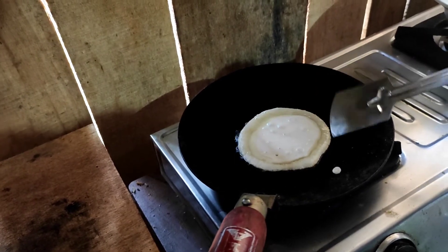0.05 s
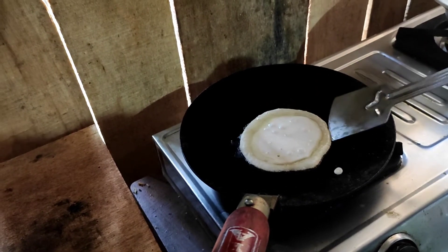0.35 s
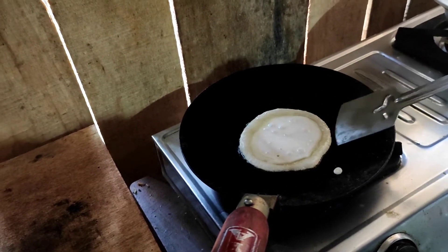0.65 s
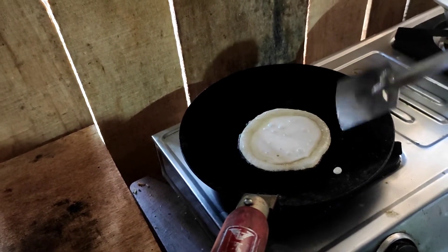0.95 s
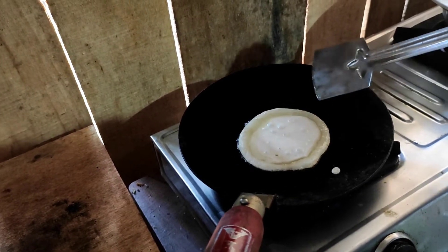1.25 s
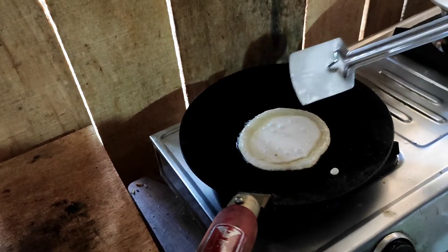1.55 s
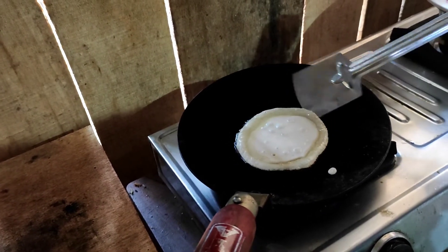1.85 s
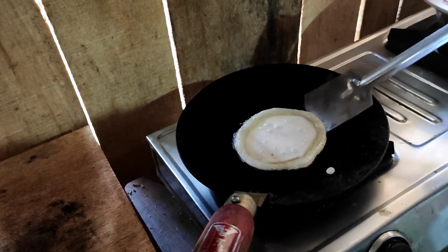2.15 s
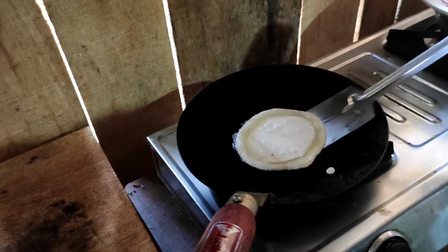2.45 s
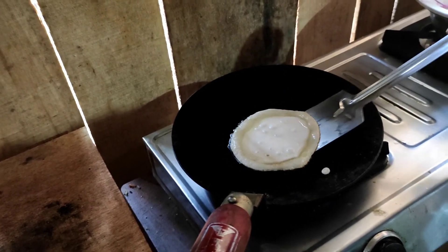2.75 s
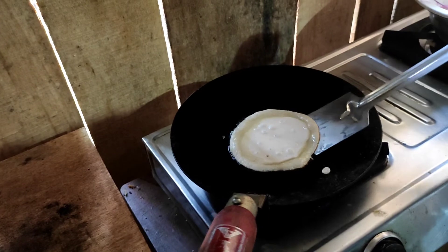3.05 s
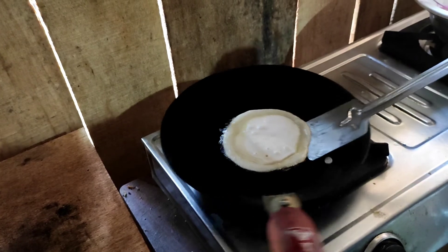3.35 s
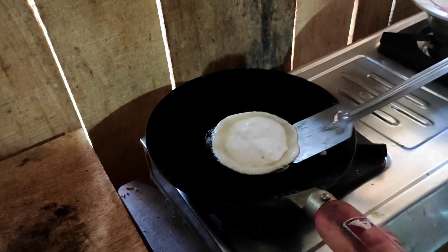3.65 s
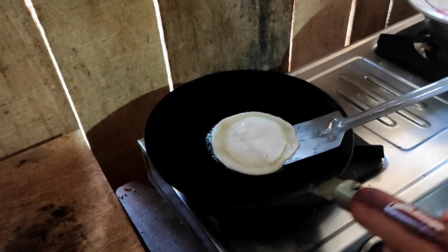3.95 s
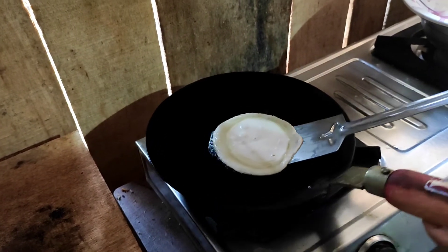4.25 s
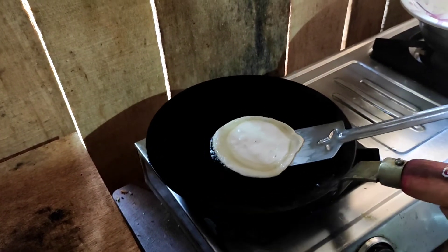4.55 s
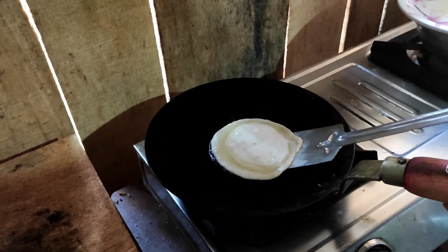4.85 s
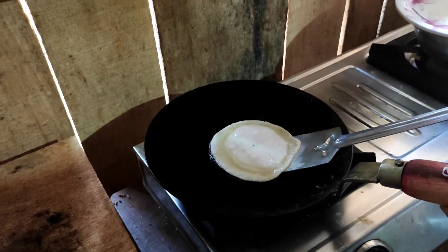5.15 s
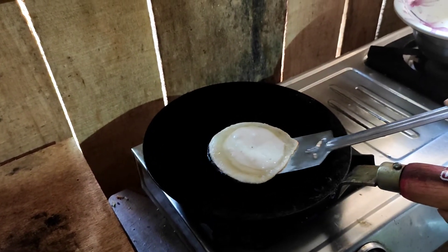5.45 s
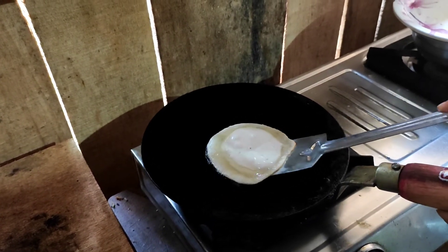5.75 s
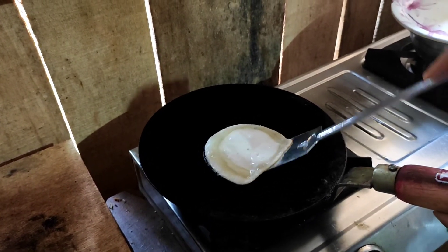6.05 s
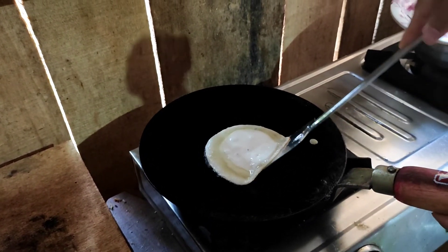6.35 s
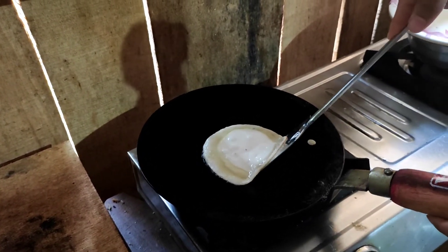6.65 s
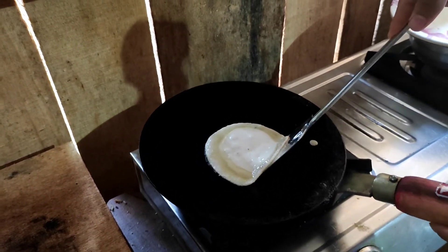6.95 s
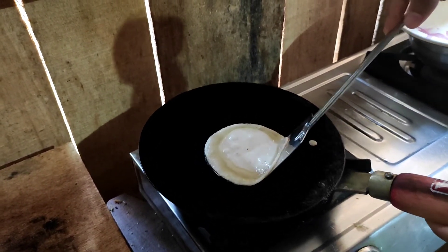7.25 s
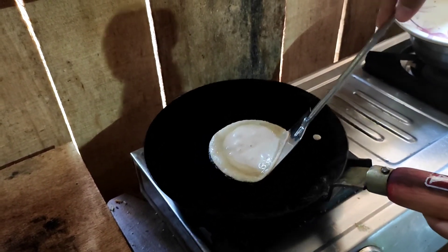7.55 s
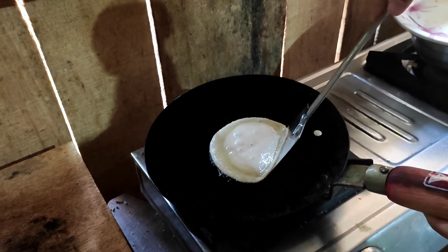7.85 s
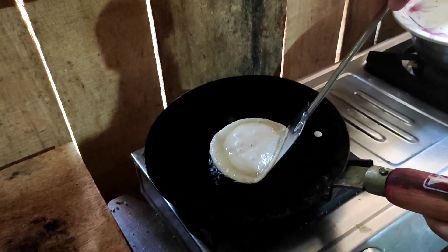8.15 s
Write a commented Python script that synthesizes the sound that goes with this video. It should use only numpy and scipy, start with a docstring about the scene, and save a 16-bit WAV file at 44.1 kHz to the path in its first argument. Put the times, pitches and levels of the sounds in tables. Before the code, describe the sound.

Heard up close in a small kitchen, oil sizzles softly over a low burner rush while a metal spatula rasps and ticks against an iron griddle. After a short lull, the scraping returns and the griddle shifts on the stove with a light grind and squeak. A busy run of bright clicks and scrapes follows as the pancake's crust crackles, with occasional dull bumps on the microphone, easing near the end.

```python
"""In a small kitchen, a steel spatula works under a pancake on a hot iron griddle, heard from close by.
Stick-slip friction makes the blade scrape, snag and click. The crust crackles, the griddle grinds on its
stand and shakes the stove, and oil sizzles over the burner's rush. Each contact briefly excites the modes
of blade and griddle; the room reflects the sound, and two microphone ports add their own resonances.
Dull thumps at the microphone, mostly on the left, coincide with some loud clicks."""
import sys
import numpy as np
from scipy import signal
from scipy.fft import rfft, irfft
from scipy.io import wavfile
from scipy.ndimage import uniform_filter1d

SR = 44100
rng = np.random.default_rng(int(sys.argv[2]) if len(sys.argv) > 2 else 0)


def master_out(mix):
    """Clip the mix to full scale and print it as 16-bit PCM to the path in sys.argv[1]."""
    frames = np.transpose(np.atleast_2d(mix))
    ceiling = np.clip(frames, -1, 1)
    pcm = np.round(ceiling * 32767).astype(np.int16)
    wavfile.write(sys.argv[1], SR, pcm)


N = 361179
TIME = np.arange(N) / SR

# snags of the blade on griddle and crust, levels relative: start_s, level_db, body_db, skid_db
SNAGS = [(.0968, -31, -6, -8), (.169, -25.5, -7, 0), (.362, -27, -3.5, -15), (0.779, -16, -5.5, 2),
         (0.798, -18, -11, -10), (.9213, -20, -6, -2), (0.9543, -16, -2, -21), (1.059, -23, -5, -2),
         (1.128, -19.5, -2, -2.5), (1.1377, -29.5, 5, 7), (1.187, -26, -0.5, 4.5), (1.3589, -20.5, -5, -14),
         (1.6133, -32.5, -4, -8), (1.718, -37, 14, -3), (2.595, -21, -0.5, 12), (2.8846, -18, 1, 3),
         (2.9371, -19.5, 3, 6.5), (3.1701, -23, -3.5, 4), (3.5489, -14.5, -2.5, -17.5),
         (3.7183, -16.5, -3, -3.5), (4.078, -25, -15, -10), (4.1834, -23.5, -0.5, 3), (4.2523, -26, -10, 0),
         (4.459, -36, 16, -1), (4.6452, -26.5, 2, -12), (4.6978, -18, -4.5, -22), (4.736, -17, 3.5, -12),
         (4.8791, -16.5, 2.5, 6), (4.9052, -19, -4, 1), (5.0995, -25, 1, -9), (5.135, -26.5, -21, -17),
         (5.172, -33, -2, -18), (5.2816, -18.5, 1.5, 3), (5.326, -22.5, -2, -20), (5.35, -17.5, -5.5, -19),
         (5.3693, -21, 0, -5), (5.3938, -21.5, -2, 3), (5.4074, -17, 3, -5), (5.4928, -17.5, -3, -20),
         (5.5658, -18.5, 1, 4.5), (5.6315, -22.5, -22, -1), (5.6575, -20.5, -12, -14),
         (5.6827, -14.5, 4, -9), (5.8062, -23.5, 4.5, -3), (5.8532, -21, -8, 4), (5.875, -19.5, 0, 0.5),
         (5.955, -23.5, -9, -6), (5.9934, -21.5, 5, -1), (6.031, -14, 0.5, 5.5), (6.0721, -19.5, 3, 2),
         (6.1225, -22, 2, -11), (6.1393, -12.5, 5, -11), (6.2402, -13.5, 2, -18), (6.286, -26, -6, -8),
         (6.301, -21.5, -8, -6), (6.3281, -16.5, -4, -14), (6.353, -15, -4, -19), (6.3881, -17.5, 1, 1),
         (6.4311, -29.5, 15, -2), (6.523, -16, -3, -16), (6.5586, -20, -6.5, -3), (6.6397, -18, -5, -20),
         (6.6799, -15, -4, -8), (6.7825, -18.5, -14, -20), (6.845, -29, -16, -11), (6.996, -27, 3.5, 1.5),
         (7.0581, -26, 0, -7), (7.0973, -22.5, -1.5, -22), (7.2464, -19.5, -4.5, -9),
         (7.2722, -29.5, 0, -14), (7.324, -23, 0, -7), (7.4115, -22, 0.5, 2.5), (7.8968, -29.5, -11, -5),
         (8.0009, -19.5, 3, -6), (8.1489, -25, 3.5, -4)]
# light rubbing as the blade leans on the griddle: time_s, level_db
PRESSURE = [(0, -47), (1.0, -42), (1.3, -52), (1.65, -46), (2.3, -45.5), (2.65, -32.5), (3.1, -44),
            (3.75, -40.5), (4.55, -39), (4.85, -33), (5.02, -44), (5.45, -35), (6.4, -37), (6.88, -43.5),
            (7.36, -41), (7.47, -35.5), (7.68, -48.5), (8.19, -44)]
# where the blade works: time_s, left_minus_right_db
BLADE_PAN = [(0, -1), (4.7, -1.5), (5.6, 0), (6.6, 1.5), (8.19, 1)]
# griddle shifting on its stand: start_s, attack_s, hold_s, release_s, grind_db, drone_db
SHIFTS = [(1.6, 0.066, 0.086, 0.092, -63, -80), (3.112, 0.21, 0.37, 0.12, -47.5, -59),
          (3.806, 0.054, 0.43, 0.71, -55, -60), (7.421, 0.042, 0.026, 0.098, -45.5, -75)]


def scraping(stick_db=1.5, stick_s=0.023, rub_body_db=3.5):
    """Stick-slip friction: the edge drives the griddle with dense, unevenly bunched micro-slips."""
    # firm pushes of the blade: start_s, attack_s, hold_s, release_s, level_db, body_db
    strokes = [(0.11, 0.085, 0.11, 0.048, -25, -6.5), (0.569, .2, .025, .1, -21, -5.5),
               (1.5, 0.087, 0.056, .15, -46, 12), (2.007, 0.0093, 0.027, 0.096, -25, -1.5),
               (2.364, .11, 0.044, .13, -22, -2), (2.727, 0.013, 0.15, 0.18, -28.5, -1),
               (2.784, .07, 0.14, 0.068, -28.5, 2.5), (3.066, .29, .14, 0.4, -23.5, 0),
               (5.043, 0.03, 0.1, 0.045, -38, 8.5), (5.607, 0.042, 0.035, .06, -27, 1.5),
               (5.75, .11, 0.018, 0.35, -28, 2.5), (6.022, 0.061, 0.024, 0.051, -31, 5.5),
               (7.719, 0.022, 0.044, 0.074, -35.5, 0)]
    snag_times = np.sort([s for s, *_ in SNAGS] + [np.inf])
    next_snag = snag_times[np.searchsorted(snag_times, TIME)]
    stuck = np.exp((TIME - next_snag) / stick_s)  # the rubbing dips just before a snag lets go
    power = undb(curve(PRESSURE) - stick_db * stuck) ** 2
    weighted_body = rub_body_db * power
    for *timing, db, body_db in strokes:
        push = (undb(db) * swell(*timing)) ** 2
        power += push
        weighted_body += body_db * push
    slips = grains(rate_hz=3800, spread_db=4)
    bunching = unit(undb(2.94 * np.tanh(wander(190)) + 1.73 * np.tanh(wander(45))))
    port_gains = undb(-0.42 + np.outer([.5, -.5], curve(BLADE_PAN)))
    return with_body(slips * bunching, weighted_body / power) * np.sqrt(power) * port_gains


def clicking(lead_in_t60=0.014, snap_t60=0.0049, skid_t60=0.11, strike_db=20):
    """Elastic release: the edge snaps free of a snag and skids on briefly."""
    force = np.zeros((2, N + SR))
    skid_slips = grains(rate_hz=1800, spread_db=4)
    lead = SR // 256
    t = np.arange(-lead, SR // 12) / SR
    for start_s, db, body_db, skid_db in SNAGS:
        start = int(start_s * SR) - lead
        # a point contact is placed more sharply than the whole edge; thin ticks favour the left
        pan_db = 2.4 * np.interp(start_s, *np.transpose(BLADE_PAN)) - 0.33 * body_db
        port_gains = undb(strike_db + db + np.array([[pan_db], [-pan_db]]) / 2)
        slips = np.take(skid_slips, start + np.arange(len(t)), axis=1, mode="wrap")
        rough = rng.standard_normal((2, len(t)))
        # a faint hiss swells for a few milliseconds before each click
        lead_in = burst(rough * (t < 0) * fade(np.abs(t), lead_in_t60), db=-12)
        snap = (t == 0) + burst(rough * (t > 0) * fade(t, snap_t60), db=-2)
        skid = burst(slips * (t > 0) * fade(t, skid_t60), skid_db - 1.5)
        force[:, start:start + len(t)] += with_body(lead_in + snap + skid, body_db) * port_gains
    return radiate(force[:, :N], ring_db=-16, near_db=-3.5, near_t60=0.046, room_db=-6.5, room_t60=0.35)


def thumping(rise_s=0.000067, fall_s=0.002, highpass_hz=25):
    """Low transients: dull, one-sided thumps at the microphone, mostly left, with some loud clicks."""
    # dull thumps: start_s, level_db
    thumps = [(4.733, -38), (4.904, -33), (5.28, -32), (5.656, -28), (6.029, -34.5), (6.137, -27.5),
              (6.237, -37), (6.639, -20), (7.244, -37)]
    impulses = np.zeros(N)
    for start_s, db in thumps:
        impulses[int(start_s * SR)] = undb(db)
    t = np.arange(SR // 20) / SR
    pulse = np.exp(-t / rise_s) - np.exp(-t / fall_s)
    pulse = signal.sosfilt(butterworth(1, highpass_hz, "highpass"), pulse)
    return convolve(impulses, pulse / np.abs(pulse).max()) * undb([[3], [-11]])


def crackling():
    """Brittle fracture: the crisp crust breaks in small, bright, lone impulses of force."""
    # crackle, strongest as the blade pries the pancake up: time_s, level_db
    crust = [(0, -46.5), (.8, -51), (2.0, -54), (3.4, -37.5), (3.9, -47), (5.0, -40.5), (6.15, -36),
             (6.9, -42), (8.19, -48)]
    return with_body(grains(rate_hz=55, spread_db=6.5), body_db=-4.5) * undb(curve(crust))


def grinding(rock_db=-35, pitch_jitter=0.0198):
    """Sliding friction: iron grates over the stand and now and then catches in a stick-slip squeal."""
    # spectrum of iron on the stand: frequency_hz, gain_db
    grind_spectrum = [(40,-24),(110,1),(180,-1),(270,-2),(380,0),(480,3),(560,-8),(680,-3.5),(900,-1),(1400,-4.5),(2500,-6),(6000,-41)]
    # squeals and groans of the metal: start_s, length_s, pitch_hz, level_db
    squeals = [(1.65,0.089,351,-57.5),(3.185,0.25,1400,-46),(4.457,0.016,2740,-36),(7.44,0.1,1420,-47.5)]
    shifting = sum(undb(db) * swell(*timing) for *timing, db, _ in SHIFTS)
    rocking = undb(curve(PRESSURE) + rock_db)  # faint grating whenever the blade leans
    grit = grains(rate_hz=1800, spread_db=2, port_scatter=0.48)
    sound = unit(colour(grit, grind_spectrum)) * (shifting + rocking)
    for start_s, length_s, pitch_hz, db in squeals:
        progress = np.clip((TIME - start_s) / length_s, 0, 1)
        grip = np.sqrt(np.sin(np.pi * progress).clip(0))
        wavering_hz = pitch_hz * (1 + pitch_jitter * wander(150))
        tone = np.sin(2 * np.pi * np.cumsum(wavering_hz) / SR)
        sound += tone * grip * undb(db + 4.2 * wander(50))
    return sound


def droning(band_hz=(385, 485)):
    """Forced vibration: the dragging iron drives one broad resonance of the sheet-steel stove body."""
    motion = sum(undb(db) * swell(*timing) for *timing, _, db in SHIFTS)
    drag = grains(rate_hz=600, spread_db=0.5, port_scatter=0.19)
    return unit(signal.sosfilt(butterworth(2, band_hz, "bandpass"), drag)) * motion


def sizzling():
    """Shot noise: tiny steam bubbles burst at random in the oil, each an impulse of force."""
    return grains(rate_hz=1500, spread_db=3.5) * undb(-52 + 0.83 * wander(5.5))


def burner_rush(rumble_hz=90):
    """Partly coherent noise: both ports share some of the rush of burner and room, but not the rumble."""
    # spectrum of burner and room: frequency_hz, gain_db
    rush_spectrum = [(20,-4.5),(50,-1),(95,0),(150,-7),(280,-11.5),(450,-9.5),(700,-15),(1200,-7.5),(3000,-13),(12000,-79)]
    noise = rng.standard_normal(N) + 1.02 * rng.standard_normal((2, N))
    rumble = signal.sosfilt(butterworth(2, rumble_hz, "lowpass"), rng.standard_normal((2, N)))
    return unit(colour(noise, rush_spectrum)) * undb(-56 + wander(2.2)) + unit(rumble) * undb(-66)


def with_body(force, body_db, thinning=0.23):
    """Contact firmness: firm contact drives the blade's bending range; light contact is thin and bright."""
    body = signal.sosfiltfilt(butterworth(2, [700, 3500], "bandpass"), force)
    treble = signal.sosfiltfilt(butterworth(2, [7800, 12000], "bandpass"), force)
    return force + (undb(body_db) - 1) * body + (undb(-thinning * body_db) - 1) * treble


def radiate(force, spots=4, **acoustics):
    """Moving source: every 10 ms the contact picks one of a few spots, each with its own echoes."""
    hold = SR // 100
    spot = np.repeat(rng.integers(0, spots, N // hold + 1), hold)[:N]
    return sum(convolve(force * (spot == k), spot_response(**acoustics)) for k in range(spots))


def spot_response(ring_db, near_db, near_t60, room_db, room_t60):
    """Impulse response of one spot: direct sound, modal ring, scatter off stove and wall, room tail."""
    # modes of blade and griddle: frequency_hz, level_db, t60_s
    steel_modes = [(445,-26.5,0.21),(823,-15,0.16),(900,-19,0.17),(1118,-13,0.12),(1550,-6.5,0.1),(2000,-3.5,0.29),(2330,4.5,0.16),(2775,2,0.092),(3010,6,0.1),(3304,2,0.037),(4370,-16,0.064),(4760,-39,0.11),(4960,-2.5,0.16),(5470,3,0.062),(6000,1,0.27),(5900,-9,0.14),(6200,-6.5,0.17)]
    # spectrum of one slip of the edge: frequency_hz, gain_db
    slip_spectrum = [(40,-32.5),(200,-18.5),(700,-22),(1200,-13),(1900,-9.5),(2500,-2),(4500,1),(6500,0.5),(9000,1),(10500,-3),(12000,-9),(14200,-13),(15500,-57)]
    # resonances of the two microphone ports: frequency_hz, gain_db
    left_port = [(1800,4),(2400,4.5),(2850,7.5),(3300,7),(3700,1),(5000,-2.5),(7100,-9),(7900,2),(8600,10),(9300,4),(10200,-0.5),(14000,-2)]
    right_port = [(1800,1.5),(2400,-1.5),(3500,-0.5),(4400,2),(5200,7),(6000,9.5),(6900,4),(8000,1.5),(9200,-3),(11000,-4),(14000,-12)]
    t = np.arange(SR // 4) / SR
    hz, db, t60 = np.transpose(steel_modes)[:, :, None]
    modes = undb(db) / np.sqrt(t60) * fade(t, t60) * np.exp(2j * np.pi * hz * t)
    port_phases = np.exp(2j * np.pi * rng.random((2, len(hz))))
    ring = (port_phases @ modes).imag
    near = rng.standard_normal((2, len(t))) * fade(t, near_t60) * (t > .0006)
    room = rng.standard_normal((2, len(t))) * fade(t, room_t60) * np.minimum(t / 0.007, 1)
    slip = colour((t == 0) + burst(near, near_db) + burst(room, room_db), slip_spectrum)
    left, right = burst(slip, 0) + burst(ring, ring_db)
    return burst(np.array([colour(left, left_port), colour(right, right_port)]), 0)


def grains(rate_hz, spread_db, port_scatter=1.74):
    """Poisson process: impulses of scattered size, each reaching the two ports differently; rms 1."""
    onsets = np.flatnonzero(rng.random(N) < rate_hz / SR)
    size, left, right, sign = rng.standard_normal((N // 4, 4))[:len(onsets)].T
    port_gains = np.sign(sign) + port_scatter * np.clip([left, right], -1.5, 1.5)
    impulses = np.zeros((2, N))
    impulses[:, onsets] = undb(spread_db * size.clip(-1.8, 1.8)) * port_gains
    return unit(impulses)


def swell(start_s, attack_s, hold_s, release_s, depth_db=21):
    """Envelope of a hand movement: it rises depth_db over the attack, holds and falls, evenly in dB."""
    before = (start_s + attack_s - TIME) / max(attack_s, .002)
    after = (TIME - start_s - attack_s - hold_s) / max(release_s, .002)
    return undb(-depth_db * np.maximum(before, after).clip(0, 8))


def wander(rate_hz):
    """Random modulation: steps smoothed by a moving average; rms 1."""
    hold = int(SR / rate_hz)
    steps = np.repeat(rng.standard_normal(N // hold + 1), hold)
    return unit(uniform_filter1d(steps, hold)[:N])


def colour(x, spectrum, size=2048):
    """Minimum-phase filter through (frequency_hz, gain_db) points."""
    hz, db = np.transpose(spectrum)
    gain = undb(np.interp(np.log(np.fft.rfftfreq(size, 1 / SR) + 1), np.log(hz), db))
    cepstrum = irfft(np.log(gain))
    cepstrum[1:size // 2] *= 2  # folding the cepstrum makes the filter causal
    cepstrum[size // 2 + 1:] = 0
    return convolve(x, irfft(np.exp(rfft(cepstrum)))).reshape(np.shape(x))


def convolve(x, response):
    """Convolution with an impulse response, channel by channel."""
    return signal.oaconvolve(np.atleast_2d(x), np.atleast_2d(response), axes=-1)[:, :np.shape(x)[-1]]


def butterworth(order, hz, kind):
    """Maximally flat filter, as second-order sections."""
    return signal.butter(order, hz, kind, fs=SR, output="sos")


def curve(rows):
    """Linear interpolation of (time_s, value) rows."""
    return np.interp(TIME, *np.transpose(rows))


def fade(t, t60):
    """Exponential decay, by 60 dB in t60 seconds."""
    return np.exp(-np.log(1000) * t / t60)


def burst(x, db):
    """Scale to a total energy in dB, averaged over channels."""
    return unit(x) * undb(db) / np.sqrt(x.shape[-1])


def unit(x):
    """Scale to rms 1."""
    return x / np.sqrt(np.mean(x ** 2))


def undb(db):
    """Decibels to gain."""
    return 10 ** (np.asarray(db) / 20)


def scene():
    """Superposition: the fine impulses share one ring and room; clicks and low sounds add to them."""
    force = scraping() + crackling() + sizzling()
    fine = radiate(force, ring_db=-14.5, near_db=-4.5, near_t60=0.043, room_db=-8.5, room_t60=0.21)
    return fine + clicking() + thumping() + grinding() + droning() + burner_rush()


def record(dry, drive=1.05, top_hz=15200):
    """Soft saturation rounds the sharpest peaks, and a steep low-pass cuts the highest treble."""
    rounded = np.tanh(drive * dry) / drive
    return signal.sosfilt(signal.ellip(8, .2, 90, top_hz, fs=SR, output="sos"), rounded)


dry = scene()
out = record(dry)
master_out(out)
```